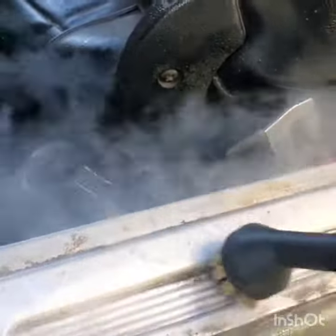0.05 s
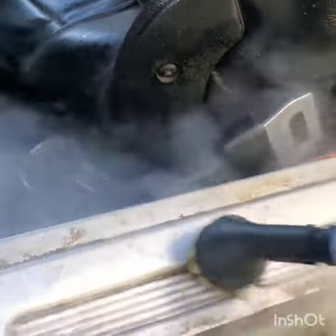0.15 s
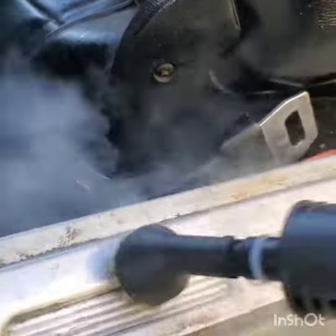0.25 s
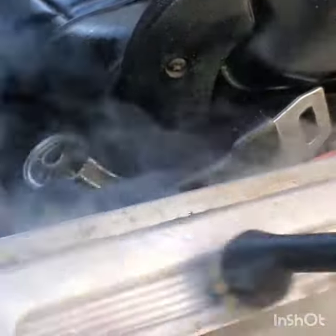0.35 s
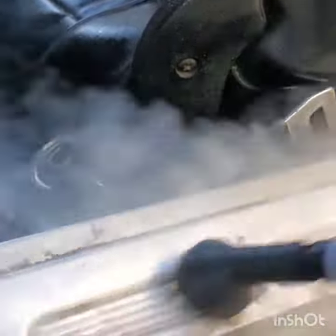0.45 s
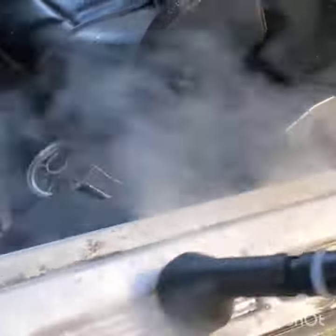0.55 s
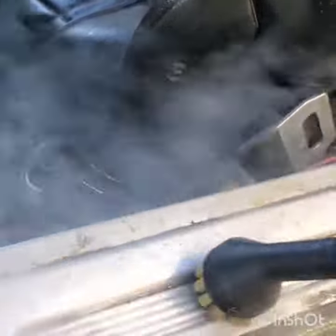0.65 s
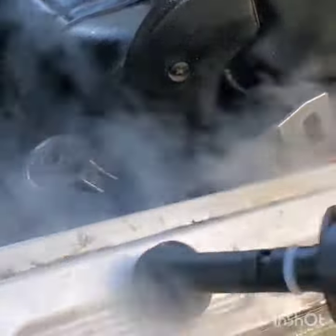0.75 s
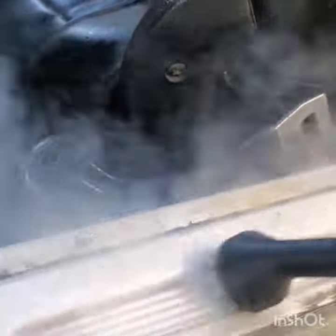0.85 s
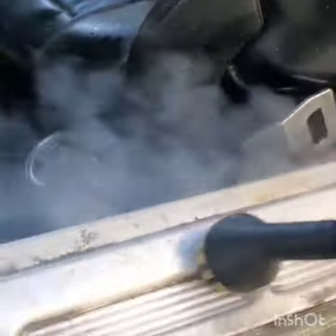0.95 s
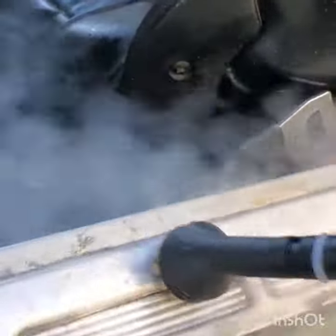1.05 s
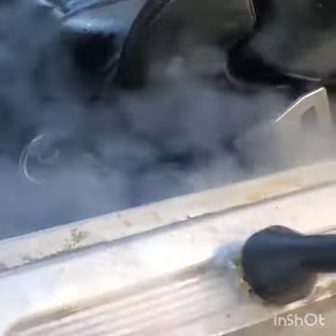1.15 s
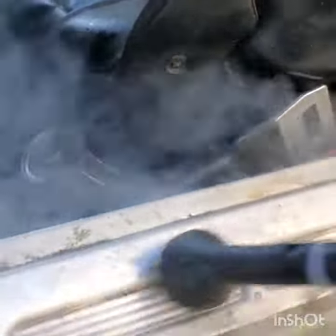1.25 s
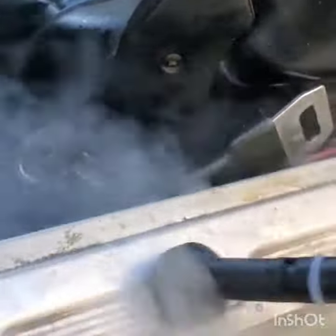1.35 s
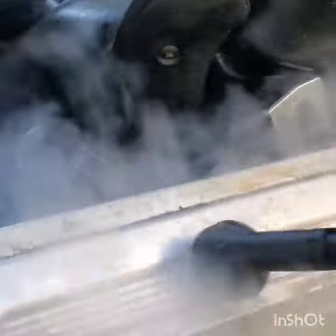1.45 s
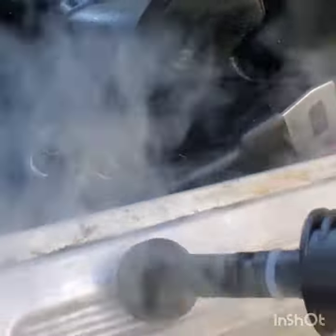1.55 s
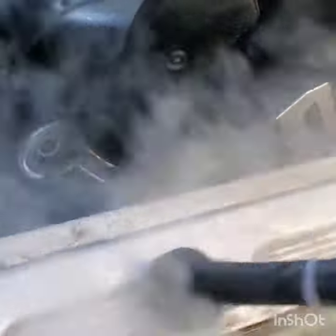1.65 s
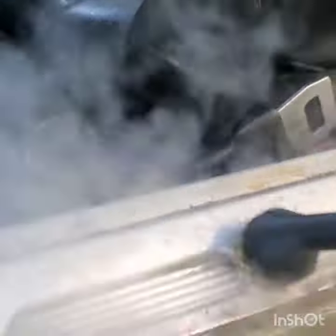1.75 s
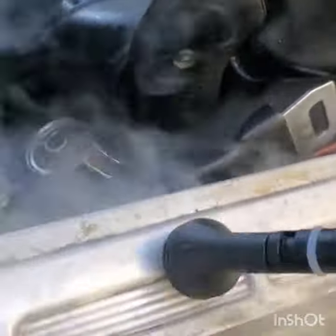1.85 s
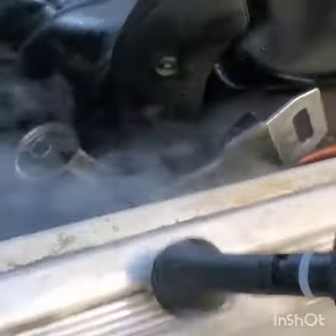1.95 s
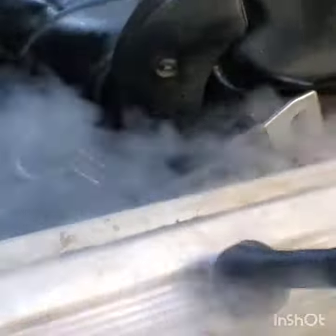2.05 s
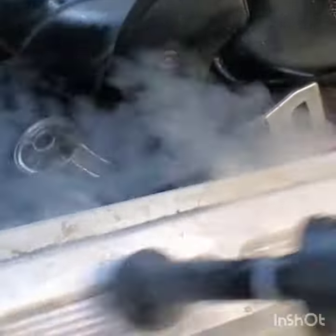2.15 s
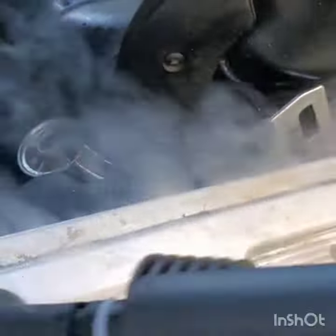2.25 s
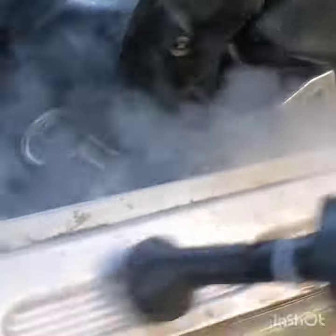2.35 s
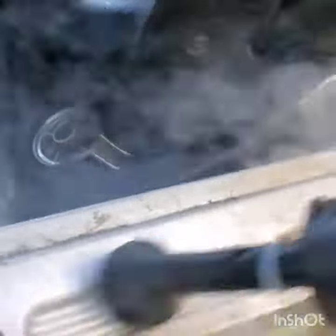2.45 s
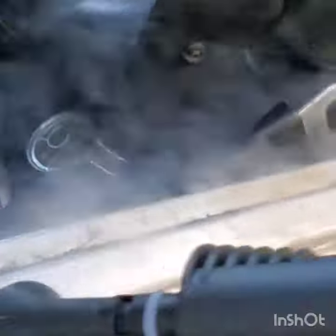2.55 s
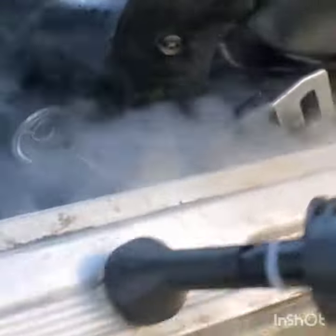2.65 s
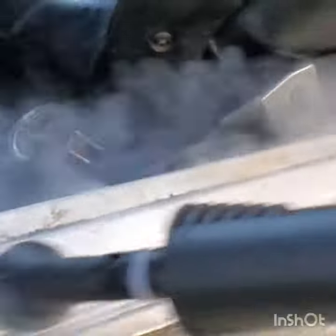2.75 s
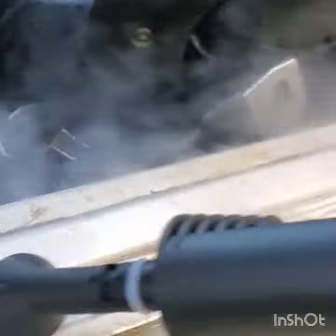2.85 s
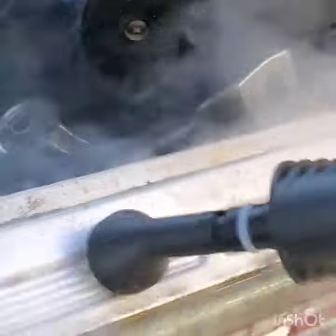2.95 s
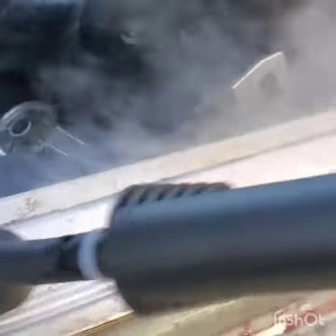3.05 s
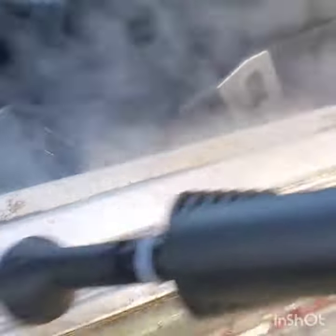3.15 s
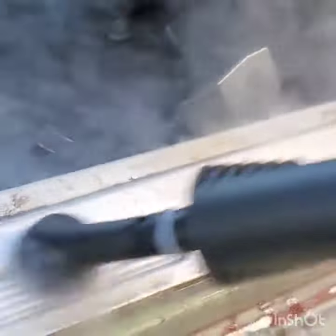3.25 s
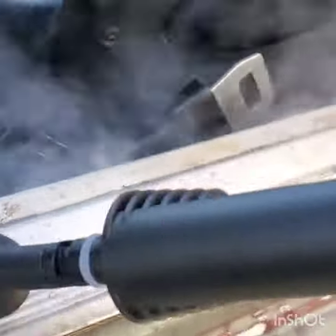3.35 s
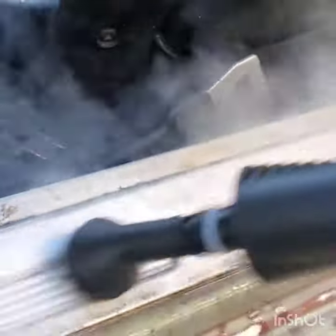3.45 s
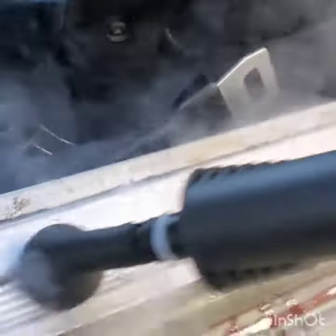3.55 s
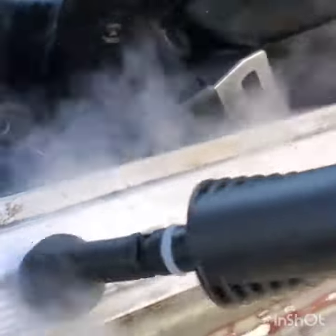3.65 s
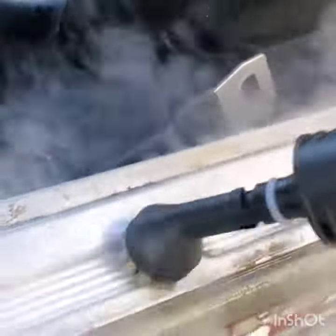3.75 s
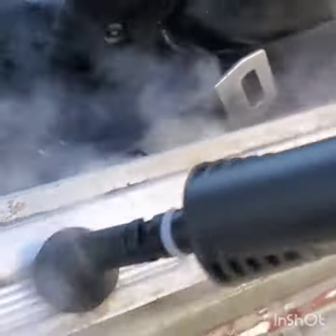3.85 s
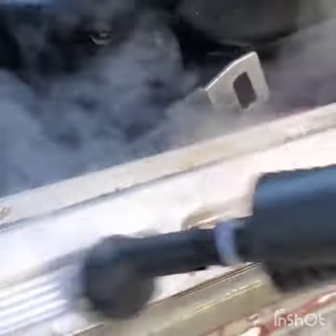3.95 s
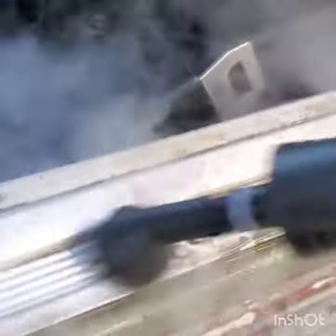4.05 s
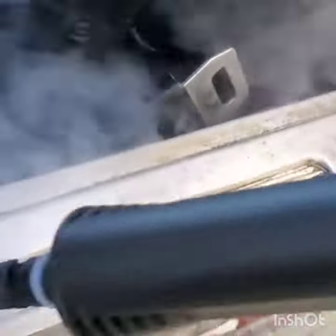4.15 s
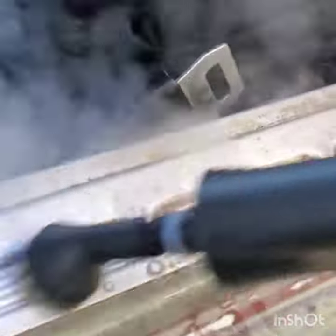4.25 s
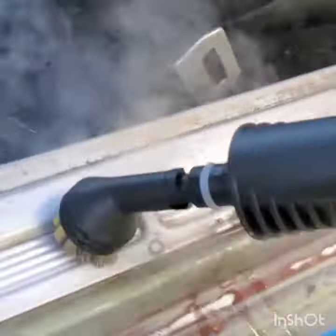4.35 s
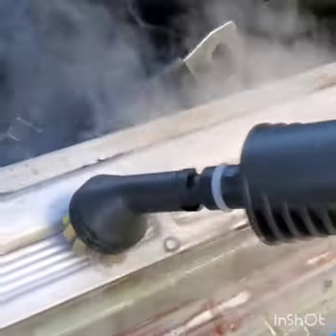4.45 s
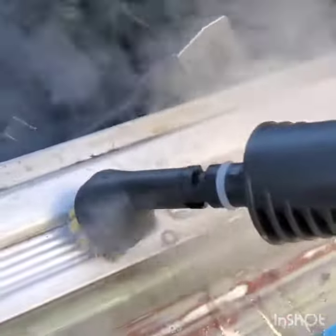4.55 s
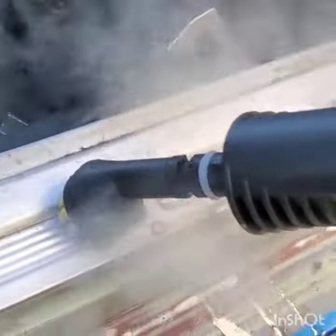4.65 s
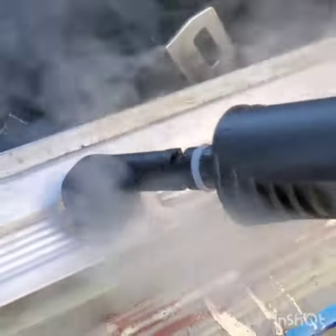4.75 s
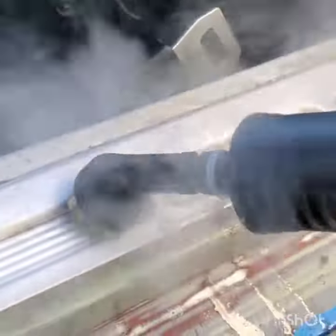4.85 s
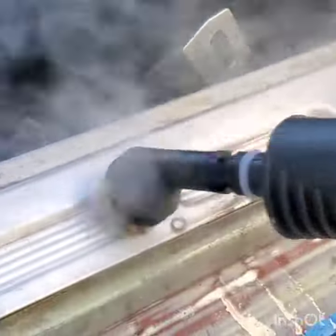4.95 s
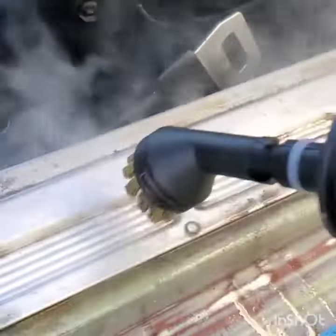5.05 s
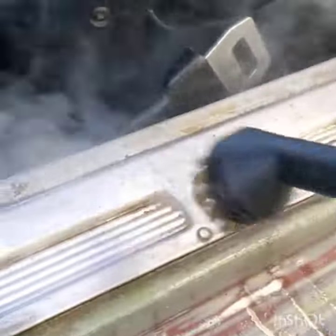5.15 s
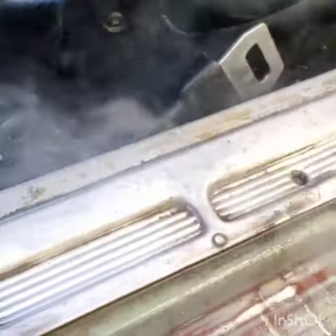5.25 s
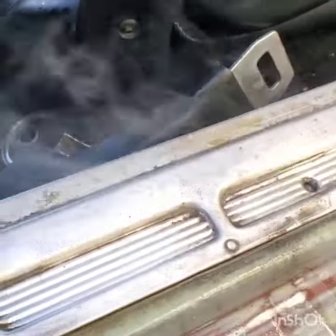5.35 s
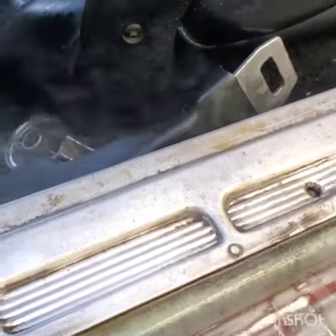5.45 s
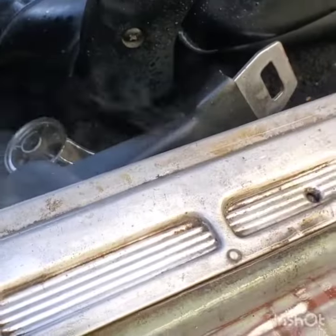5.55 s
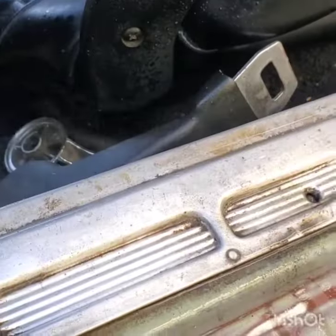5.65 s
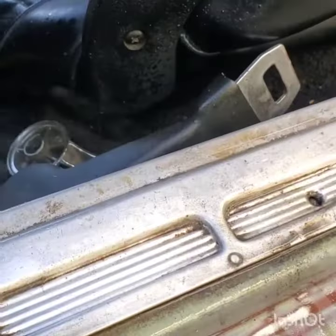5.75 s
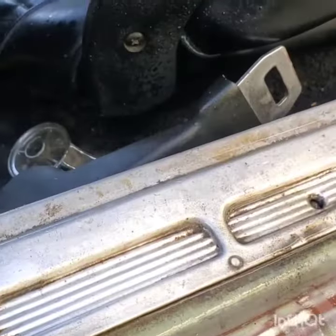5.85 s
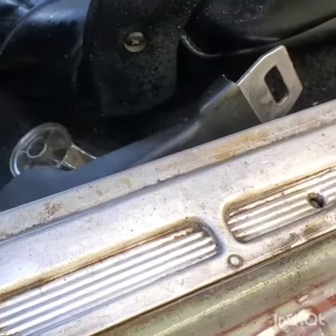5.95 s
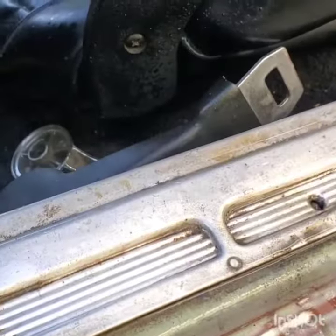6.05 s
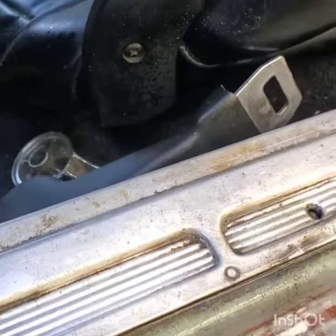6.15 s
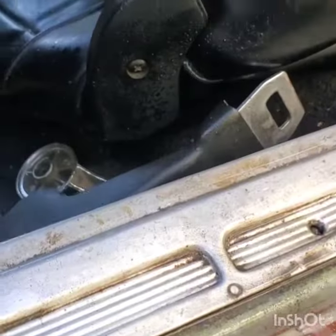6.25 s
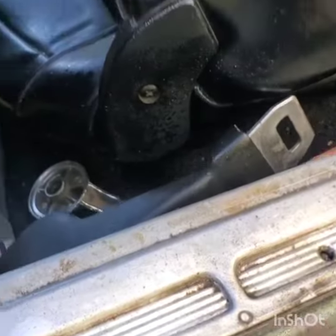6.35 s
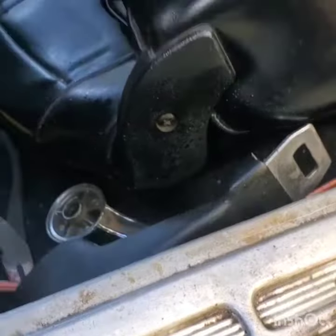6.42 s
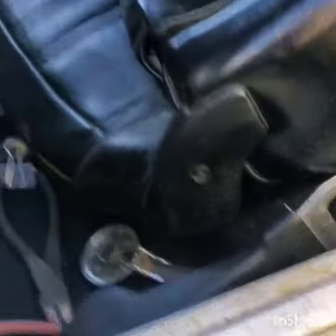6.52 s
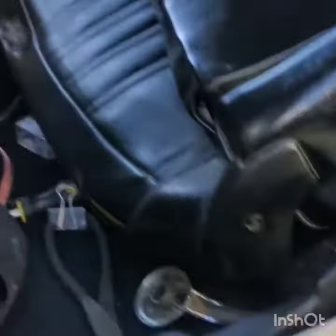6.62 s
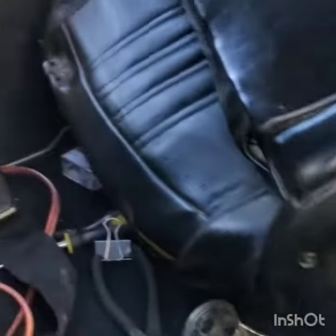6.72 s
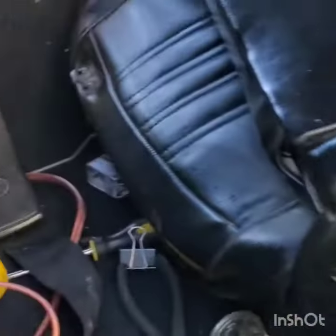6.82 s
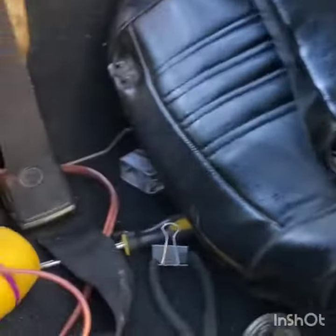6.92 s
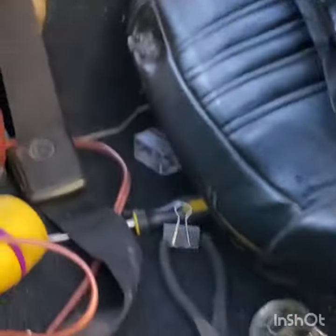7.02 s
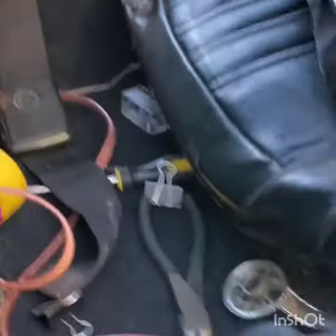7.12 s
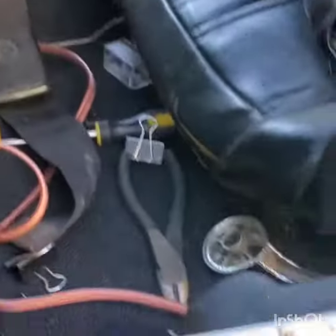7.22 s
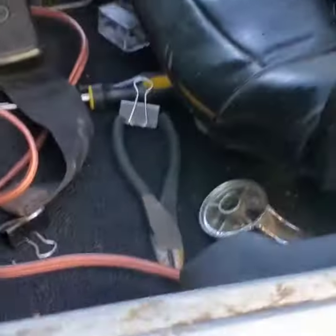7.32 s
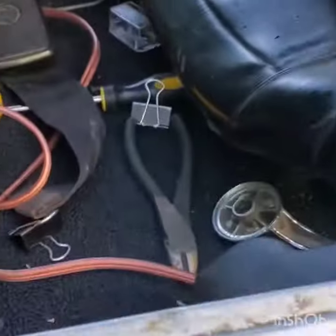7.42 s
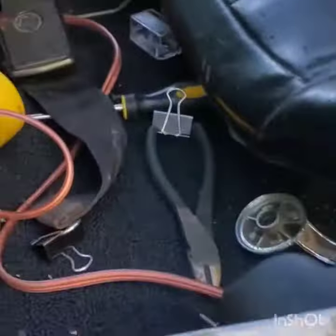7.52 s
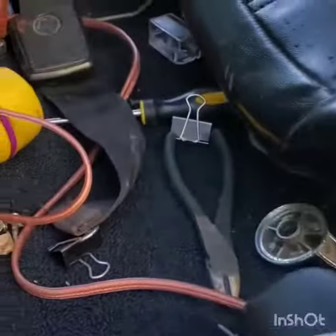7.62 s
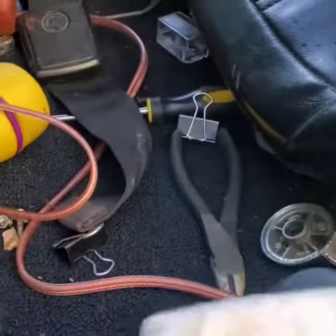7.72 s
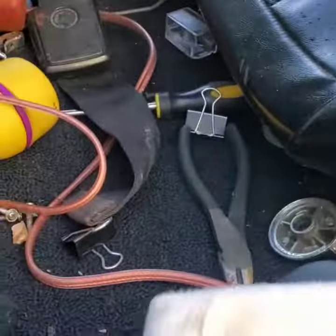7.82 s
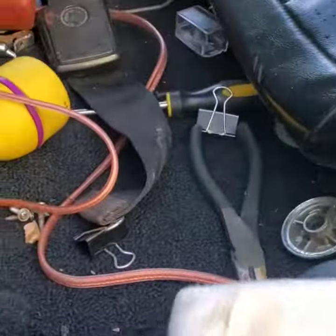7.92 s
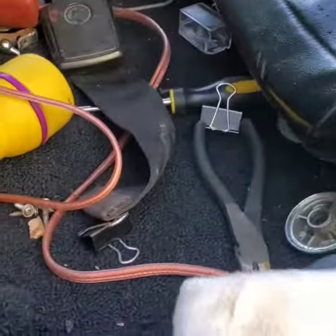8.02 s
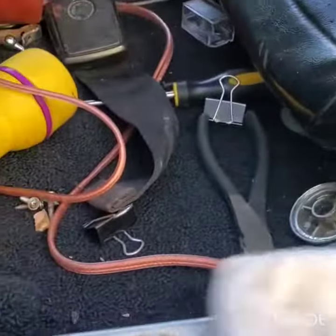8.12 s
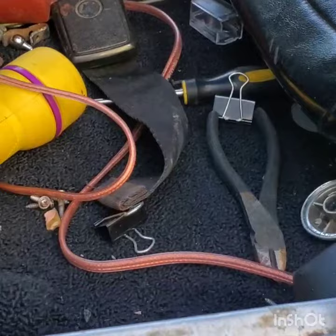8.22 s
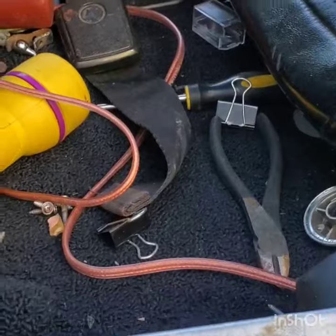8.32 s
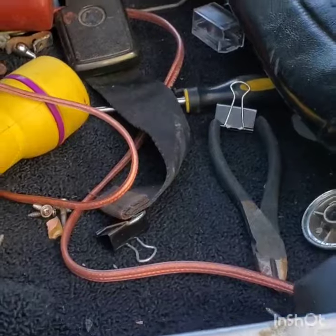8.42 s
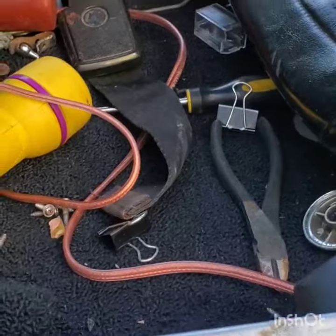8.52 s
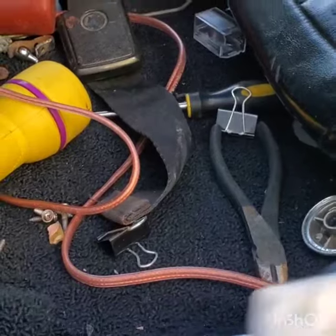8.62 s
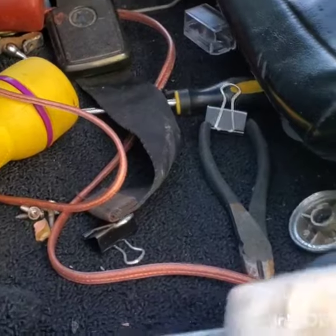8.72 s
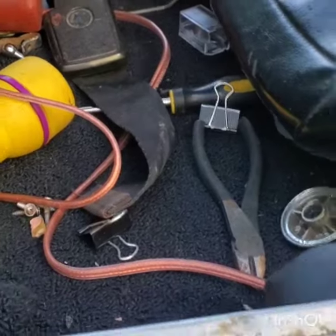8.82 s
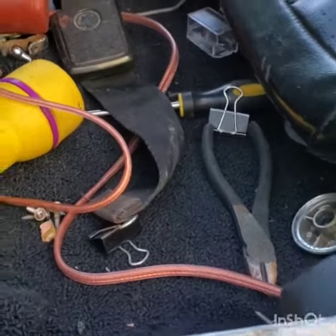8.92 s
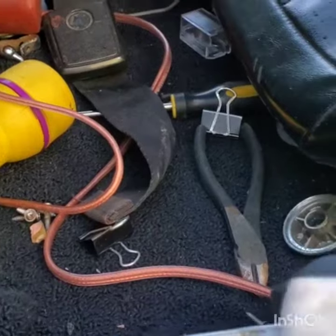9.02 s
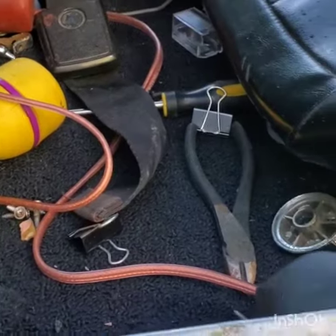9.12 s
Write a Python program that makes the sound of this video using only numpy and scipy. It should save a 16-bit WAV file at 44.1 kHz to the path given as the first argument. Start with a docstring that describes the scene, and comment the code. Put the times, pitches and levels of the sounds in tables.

```python
"""A handheld steam cleaner hisses on the metal door sill of a car, its brush nozzle sweeping to and fro.
Outdoors, at a two-port stereo microphone whose left port faces the sill. Turbulent steam makes the hiss;
steam trapped under the brush flutters. The trigger is let go and the jet dies. Over a low rumble a far
bird calls three times, a cloth rubs the sill in short strokes and something hard lands with a knock."""
import sys
import numpy as np
from scipy import signal
from scipy.fft import rfft, irfft
from scipy.io import wavfile
from scipy.ndimage import uniform_filter1d

SR = 44100
rng = np.random.default_rng(int(sys.argv[2]) if len(sys.argv) > 2 else 0)


def put_to_file(sound):
    """Save the sound as 16-bit audio at rate SR, in the file named by the first command-line argument."""
    columns = np.atleast_2d(sound).T  # one column per channel
    safe = np.clip(columns, -1, 1)
    whole_steps = np.round(safe * 32767)
    wavfile.write(sys.argv[1], SR, whole_steps.astype(np.int16))


N = 404829
TIME = np.arange(N) / SR
BINS = np.fft.rfftfreq(1024, 1 / SR)  # f/Hz and t/s of the grid on which noise is shaped
FRAMES = np.arange(N // 256 + 5) * 256 / SR

# how alike the two ports hear diffuse sound: f/Hz, coherence
AIR_COHERENCE = [(25, .65), (60, .78), (130, .93), (290, .86), (700, .66), (1400, .38), (3000, .05)]
# brush strokes, each a push and a pull back: start t/s, reach/ms off the sill echo's lag, steam puff/dB
BRUSH_STROKES = [(.12, .05, 2.5), (.39, 0.077, 2.5), (.63, .065, 4.5), (.92, 0.045, 1), (1.19, 0.054, 5.5),
                 (1.45, 0.074, 7), (1.77, 0.039, 7.5), (2.08, 0.17, 6.5), (2.38, 0.14, 12),
                 (2.66, 0.095, 10), (2.93, .093, 10.5), (3.21, 0.12, 7.5), (3.47, 0.075, 12.5),
                 (3.74, 0.097, 2.5), (4.02, 0.16, 2)]


def gain_of(db):
    """Decibels to amplitude."""
    return 10 ** (np.asarray(db) / 20)


def unit_rms(x):
    """Scales to rms 1."""
    return x / np.sqrt(np.mean(x ** 2) + 1e-20)


def bell(x, width):
    """A bell of height 1 around x = 0."""
    return np.exp(-(x / width) ** 2)


def band(centre_hz, octaves):
    """A bell over log frequency."""
    return bell(np.log2((BINS + 1) / centre_hz), octaves)


def at_hz(table, hz):
    """Each column of a frequency table, interpolated on a log axis."""
    f, *columns = np.transpose(table)
    return np.squeeze([np.interp(np.log(hz + 1), np.log(f + 1), c) for c in columns])


def at_time(table, t):
    """Each column of a time table, interpolated."""
    s, *columns = np.transpose(table)
    return np.squeeze([np.interp(t, s, c) for c in columns])


def add(mix, s, sound):
    """Mixes a sound in at time s."""
    part = mix[..., round(s * SR):][..., :sound.shape[-1]]
    part += sound[..., :part.shape[-1]]


def wander(count, size):
    """A random waver smoothed over size steps, rms 1."""
    return unit_rms(uniform_filter1d(rng.standard_normal(count), size))


def patches(frames, bins):
    """Random blotches in time and frequency, rms 1."""
    z = rng.standard_normal((len(FRAMES), len(BINS)))
    return unit_rms(uniform_filter1d(uniform_filter1d(z, frames, 0), bins, 1))


def noise(colour_db=0, coherence=AIR_COHERENCE, lead=0, left_path=1, right_path=1):
    """Coloured noise at the two ports, each with its own path; their mean has rms 1."""
    a, b, c, d = rng.standard_normal((4, len(FRAMES), len(BINS)))
    alike = np.clip(at_hz(coherence, BINS), -1, 1)
    left = a + 1j * b
    right = (alike * left + np.sqrt(1 - alike ** 2) * (c + 1j * d)) * np.exp(-1j * lead)
    spectra = np.array([left * left_path, right * right_path]) * gain_of(colour_db)
    x = signal.istft(spectra.swapaxes(1, 2), nperseg=1024, noverlap=768)[1][:, :N]
    return x / x.mean(0).std()


def brush_motion(rest_s=4.32, push_share=.48):
    """The hand's sweep: travel (0 drawn back, 1 pushed out), speed (-1 to 1) and travel as ms of echo."""
    starts, reach_ms, _ = np.transpose(BRUSH_STROKES)
    strokes_done = np.interp(FRAMES, [*starts, rest_s], np.arange(len(starts) + 1))
    angle = np.pi * np.interp(strokes_done % 1, [0, push_share, 1], [0, 1, 2])
    travel = (1 - np.cos(angle)) / 2
    return travel, np.sin(angle), travel * reach_ms[strokes_done.astype(int) % len(starts)]


def valve(sag_db, release_s=4.735, gulp_s=4.757, shut_s=4.866, shut_db_per_s=700, leak_db_per_s=150):
    """Gain as the trigger is let go: the jet gulps and sags, the valve seats, the last steam leaks."""
    spent = np.clip((TIME - release_s) / (shut_s - release_s), 0, 1)
    shut_for = np.maximum(TIME - shut_s, 0)
    gulp_db = -6.5 * bell(TIME - gulp_s, .014)
    flow_db = sag_db * spent ** 2 + gulp_db - shut_db_per_s * shut_for
    leak_db = -24.5 + .27 * sag_db - leak_db_per_s * shut_for
    return gain_of(np.maximum(flow_db, leak_db))


def steam_jet(fizz_hz=7500, spray_hz=13200, sill_echo=.4, scatter_hz=12500):
    """Turbulent hiss, fizz and spray, coloured by the nozzle and combed by a moving echo off the sill."""
    # the jet's colour at the microphone: f/Hz, left level/dB, right level/dB
    jet_colour = [(895, -40.5, -53), (1650, -30.5, -31.5), (2040, -13, -7), (3030, -5.5, -5.5),
                  (3520, 0.5, 0), (4150, -1, -7.5), (4730, -1, -6), (5480, -2.5, -9), (7030, -2, -5),
                  (8300, -4, -14), (9800, -2, -8), (12100, -7, -13.5), (13800, -4, -2.5),
                  (15730, -5.5, -7.5)]
    # how alike the ports hear it: f/Hz, coherence
    jet_coherence = [(1700, .55), (2100, .7), (3700, .75), (4800, .3), (5600, .62), (7000, .58),
                     (10000, .3), (16000, .25)]
    # it reaches the left port first, bent by the housing: f/Hz, phase lead/rad
    left_lead = [(600, 0.5), (1050, -1.5), (1400, -0.3), (1700, -1.5), (2100, 1.2), (2700, 1.5),
                 (3400, 2.5), (3850, 3), (4400, 3.5), (5300, 6.5), (6000, 9.5), (7500, 11.5), (9400, 14.5),
                 (11700, 22.5), (13300, 23), (15000, 28), (16000, 21)]
    # nozzle resonances: f/Hz, width/Hz, boost/dB
    resonances = [(3022, 170, 5), (3575, 130, 5), (4280, 240, 2), (5350, 200, 0.5), (5777, 70, 1),
                  (6870, 61, 2), (15585, 200, 10.5)]
    # the jet brightens for a moment: t/s, boost/dB, f/Hz
    spurts = [(.91, 3.5, 13500), (2.08, 3.5, 14030), (2.24, 4, 15000), (2.93, 3.5, 11000),
              (3.12, 5.5, 15000), (3.69, 3, 5510), (4, 6, 14430)]
    # sill echo with the nozzle drawn back: t/s, lag/ms
    drawn_back_lag = [(0, .825), (1.2, .86), (2.08, .855), (2.4, .8), (3.4, .82), (4, .9), (4.85, .89)]
    # one treble band at the right port dulls halfway through: t/s, level/dB
    right_treble = [(0, -2), (.7, 2.5), (2.6, 1.5), (3.1, -3), (4.2, -3.5), (4.7, -1)]
    # drift as the aim changes: t/s, hiss level/dB, fizz level/dB, spray level/dB
    aim = [(0, -27, -28.5, -27), (.22, -23.5, -25.5, -27.5), (1, -24, -26, -29), (1.9, -24.5, -25.5, -29.5),
           (2.3, -23.5, -25.5, -27.6), (2.9, -23.5, -25, -27), (3.6, -24.5, -26, -29.8),
           (4.2, -24, -27, -29), (4.7, -23.5, -28.3, -27)]
    # how hiss, fizz and spray answer the hand: full reach/dB, full push/dB, waver/dB, pressure sag/dB
    response = [(0, -.5, .3, -8), (-0.8, -0.25, .5, -24), (-1, -1.6, 1.2, -41)]
    travel, speed, out_ms = brush_motion()
    colour_db = at_hz(jet_colour, BINS)[:, None] + 1.31 * patches(8, 14)
    colour_db += sum(db / (1 + (2 * (BINS - hz) / width) ** 2) for hz, width, db in resonances)
    colour_db += .8 * patches(2, 200)  # water in the jet makes it sputter
    colour_db += 3 * np.array([patches(40, 2), patches(40, 2)])  # cabin echoes: a fine, slow ripple
    colour_db += sum(db * np.outer(bell(FRAMES - s, .035), band(hz, .33)) for s, db, hz in spurts)
    lag_s = (at_time(drawn_back_lag, FRAMES) - out_ms) / 1000
    echo = sill_echo / (1 + (BINS / scatter_hz) ** 6)  # the steam cloud scatters the top end
    left_comb = 1 - echo * np.exp(-2j * np.pi * BINS * lag_s[:, None])
    right_shade = gain_of(np.outer(at_time(right_treble, FRAMES), band(7600, .22)))
    above_hiss, above_fizz = (1 / (1 + (hz / (BINS + 1)) ** 16) for hz in (fizz_hz, spray_hz))
    shares = [1 - above_hiss, above_hiss * (1 - above_fizz), above_fizz]
    out, lead = np.zeros((2, N)), at_hz(left_lead, BINS)
    for share, aim_db, changes in zip(shares, at_time(aim, FRAMES), response):
        reach_db, push_db, waver_db, sag_db = changes
        level_db = aim_db + reach_db * travel + push_db * speed + waver_db * wander(len(FRAMES), 12)
        band_db = colour_db + 10 * np.log10(share + 1e-12)
        hiss = noise(band_db, jet_coherence, lead, left_comb, right_shade)
        out += gain_of(np.interp(TIME, FRAMES, level_db)) * valve(sag_db) * hiss
    return out


def brush_flutter(level_db=-41.5, push_delay_s=.058, return_delay_s=.235, puff_s=.026):
    """Steam trapped under the brush flutters and puffs out with each stroke; a long reach buffets."""
    # the flutter's colour: f/Hz, level/dB
    flutter_colour = [(40, -15.5), (100, -16.5), (170, -6), (270, -4.5), (400, -6.5), (540, -7.5),
                      (660, -1), (830, -2), (1050, 0), (1300, 2), (1600, 1), (2200, 3), (4000, -41)]
    puffs_db = sum(db * bell(FRAMES - s - push_delay_s, puff_s)
                   + bell(FRAMES - s - return_delay_s, puff_s) for s, _, db in BRUSH_STROKES)
    hollow = .3 + .7 * band(820, octaves=.55)
    colour_db = at_hz(flutter_colour, BINS) + np.outer(puffs_db, hollow)
    colour_db += 2.5 * patches(8, 5) + .86 * patches(6, 40)
    _, _, out_ms = brush_motion()
    buffet_db = 45 * np.outer(out_ms - out_ms.mean(), band(190, octaves=.9))
    return gain_of(level_db) * valve(sag_db=-3) * noise(colour_db + buffet_db)


def outdoors():
    """Ambience around the car: low rumble and the wash of distant traffic."""
    # the background rumble and wash come up as the recorder's gain recovers after the jet stops:
    # t/s, rumble level/dB, wash level/dB
    background_level = [(0, -59, -76), (4.9, -57, -61), (5.35, -59.5, -65), (5.85, -58.5, -62),
                        (6.3, -48, -54.5), (6.6, -48, -50), (7.6, -47.5, -51.5), (8.6, -47.5, -53),
                        (9.0, -49, -50), (9.15, -42.5, -51)]
    # the rumble's colour: f/Hz, level/dB
    rumble_colour = [(15, -31), (30, -19), (45, -4.5), (58, 3), (80, -3), (104, 2.5), (135, -10),
                     (200, -31), (400, -53.5)]
    # the wash's colour: f/Hz, level/dB
    wash_colour = [(70, -12.5), (150, 4.5), (230, 0.5), (340, 2), (470, -5.5), (850, 0), (1300, -7),
                   (1900, -12.5), (2600, -20.5), (4500, -19.5), (6500, -24.5), (8500, -38), (15500, -42.5)]
    rumble_db, wash_db = at_time(background_level, TIME)
    hz = np.fft.rfftfreq(N, 1 / SR)
    rumble = irfft(rfft(noise()) * gain_of(at_hz(rumble_colour, hz)), N)
    wash = noise(at_hz(wash_colour, BINS) + patches(12, 8))
    return gain_of(rumble_db) * unit_rms(rumble) + gain_of(wash_db) * wash


def taps():
    """Small handling taps and a last spit, each a quickly damped band of noise."""
    # taps and spit: t/s, level/dB, centre f/Hz, width/octaves, t60/s
    bursts = [(4.919, -53, 1000, 1.2, .07), (5.108, -72.5, 6000, .7, .15), (5.535, -51.5, 430, .35, 0.11),
              (5.536, -64, 3000, 1, .07), (5.558, -58, 1500, 1.3, .05), (7.2724, -31.5, 4580, 0.73, 0.0042),
              (7.32, -66, 10000, .7, .04)]
    out, t = np.zeros((2, N)), np.arange(SR // 4) / SR
    hz, white = np.fft.rfftfreq(len(t), 1 / SR), noise()
    for s, db, centre_hz, octaves, t60 in bursts:
        colour = np.exp(-.5 * (np.log2((hz + 1) / centre_hz) / octaves) ** 2)
        burst = irfft(rfft(white[:, round(s * SR):][:, :len(t)]) * colour, len(t))
        add(out, s, unit_rms(burst) * gain_of(db - 60 * t / t60))
    return out


def far_bird(walls_t60_s=.3, rasp=.066):
    """A raspy falling whistle from far off, smeared by the walls around the yard."""
    # calls: t/s, level/dB
    calls = [(5.1, -74), (5.808, -66.5), (6.585, -54.5)]
    # the fall of each call: t/s from its start, f/Hz, relative level/dB
    fall = [(0, 4350, -12), (.014, 4180, 2), (0.038, 3720, -3), (.064, 3380, -2), (.09, 3200, -8),
            (.12, 3060, -17)]
    t, age = np.arange(0, fall[-1][0], 1 / SR), np.arange(SR // 3) / SR
    hz, shape_db = at_time(fall, t)
    out = np.zeros((2, N))
    for s, db in calls:
        pitch = hz * (1 + rasp * wander(len(t), 30))
        call = np.sqrt(2) * gain_of(db + shape_db) * np.sin(2 * np.pi * np.cumsum(pitch) / SR)
        walls = rng.standard_normal((2, len(age))) * gain_of(-60 * age / walls_t60_s)
        add(out, s, signal.fftconvolve(call[None], walls / np.linalg.norm(walls.mean(0)), axes=1))
    return out


def cloth(grain=.15, pivot_hz=7000, linger_s=.0069, swell_db=4.5):
    """Fibres catch and slip on the sill; each stroke swells, stops and lingers briefly in the cabin."""
    # the rub's colour: f/Hz, level/dB
    rub_colour = [(500, -25), (1200, -0.5), (2300, 0), (4200, 0), (6300, 0), (7800, -7.5), (10500, -2),
                  (13000, -4), (15500, -0.5)]
    # strokes: start t/s, end t/s, relative level/dB, soft edge/s, treble tilt/dB per octave
    wipes = [(5.495, 5.622, -69.5, 0.03, -3.5), (5.623, 5.85, -64, 0.055, 3), (6.006, 6.11, -66, .05, -3),
             (6.434, 6.612, -53, 0.073, 1), (6.585, 6.70, -58.5, .05, -2), (6.69, 6.998, -58.5, 0.12, -0.5),
             (6.958, 7.423, -62, 0.13, 0.5), (8.084, 8.342, -48.5, 0.038, -1),
             (8.496, 8.652, -46, 0.05, 0.5), (8.705, 8.855, -46.5, 0.047, 0),
             (8.888, 9.007, -45, 0.035, 0.5), (9.048, 9.206, -44.5, 0.064, 1.5)]
    rub = noise(at_hz(rub_colour, BINS) + 1.7 * patches(10, 24))
    rub *= np.exp(grain * wander(N, 90))
    out, decay = np.zeros((2, N)), np.exp(-1 / (linger_s * SR))
    for start, end, db, edge, tilt_db in wipes:
        wipe = rub[:, round(start * SR):round(end * SR) + SR // 5]
        count = wipe.shape[1]
        octaves = np.log2(np.maximum(np.fft.rfftfreq(count, 1 / SR), 500) / pivot_hz)
        wipe = unit_rms(irfft(rfft(wipe) * gain_of(tilt_db * octaves), count))
        t = np.arange(count) / SR
        press = np.sin(np.pi / 2 * np.clip(np.minimum(t, end - start - t) / edge, 0, 1)) ** 2
        press *= gain_of(swell_db * (t / (end - start) - .5))  # the hand bears down through the stroke
        envelope = np.sqrt(signal.lfilter([1 - decay], [1, -decay], press ** 2))
        add(out, start, gain_of(db + 1) * envelope * wipe)
    return out * gain_of([[-.5], [.5]])  # just right of centre


def knock(ring_db=-23, tail_db=8, thump_db=17, thump_hz=850, crack_db=3, grit_db=-29, grit_s=.0034):
    """A hard thing lands and chatters: each contact, a push with a gritty scrape, rings body and cabin."""
    # contacts: t/s, relative level/dB, contact time/ms
    contacts = [(7.7202, -3.5, 0.75), (7.7225, -9, 0.44), (7.723, 5, 0.19), (7.7243, -3.5, 0.34),
                (7.726, -7, 0.074), (7.7289, -6, 0.47), (7.7352, -29, 0.18)]
    # the body's modes: f/Hz, relative level/dB, t60/s
    modes = [(165, -22, .25), (241, -17.5, 0.54), (342.5, -24, 0.35), (460, -12.5, .15), (660, -6, 0.048),
             (828, -0.5, 0.1), (975, -9, 0.15), (1116, -4, 0.038), (1250, 0, 0.035), (1496, -13, 0.047),
             (1600, -13, 0.068), (2040, -6, 0.088), (2290, -6, .08), (2611, -8, .06), (3900, -17, .08),
             (5370, 10, 0.055), (7903, -11, .08)]
    # the cabin's short ring: f/Hz, relative level/dB, t60/s
    cabin = [(60, -22, 0.65), (250, -8, 0.29), (700, 2, 0.1), (1800, -5, 0.14), (3180, -1, 0.13),
             (5400, 1.5, 0.1), (8900, -15.5, 0.18), (15000, -11, .13)]
    t, start = np.arange(SR // 2) / SR, contacts[0][0] - .001
    pushes, grit = np.zeros(len(t)), np.zeros((2, len(t)))
    for s, db, contact_ms in contacts:
        since = t - (s - start)
        push = np.exp(-2 * (since * 1000 / contact_ms) ** 2)
        pushes += gain_of(db) * push / push.sum()
        scrape = (since > 0) * np.exp(-abs(since) / grit_s)
        grit += gain_of(db + grit_db) * scrape * rng.standard_normal((2, len(t)))
    phases = rng.normal(0, .75, (len(modes), 2, 1))  # high modes reach the ports out of step
    ring = sum(gain_of(db - 60 * t / t60) * np.sin(2 * np.pi * hz * t + phase * min(hz / 1000, 4))
               for (hz, db, t60), phase in zip(modes, phases))
    body = gain_of(ring_db) * signal.fftconvolve(pushes + .36 * grit, ring, axes=1)
    hz, age, spectra = signal.stft(noise()[:, SR:SR + len(t)], SR, nperseg=256)
    colour_db, t60 = at_hz(cabin, hz)[:, :, None]
    tail = signal.istft(spectra * gain_of(colour_db - 60 * age / t60), SR)[1][:, :len(t)]
    echoes = gain_of(tail_db) * signal.fftconvolve(pushes + grit, tail / np.linalg.norm(tail[0]), axes=1)
    echoes = signal.sosfilt(signal.butter(3, 80, "highpass", fs=SR, output="sos"), echoes)
    # the struck panel gives way and springs back: one heavily damped swing
    thump = -signal.lfilter(*signal.butter(1, [thump_hz / 2, thump_hz * 2], "bandpass", fs=SR), pushes)
    out = np.zeros((2, N))
    add(out, start, body + echoes)
    add(out, start, gain_of(thump_db) * thump + gain_of(crack_db) * grit)
    return out * gain_of([[.6], [-.6]])  # just left of centre


def scene():
    """All sources as they reach the microphone's two ports."""
    return steam_jet() + brush_flutter() + outdoors() + cloth() + knock() + taps() + far_bird()


def record(dry, edge_hz=15850):
    """The recorder's band limit: a steep low-pass."""
    lowpass = signal.firwin(801, edge_hz, window=("kaiser", 8), fs=SR)
    return signal.oaconvolve(dry, lowpass[None], "same")


dry = scene()
out = record(dry)
put_to_file(out)
```